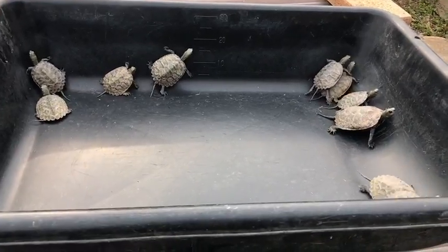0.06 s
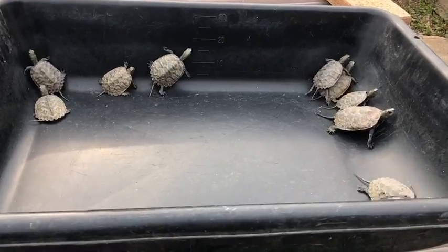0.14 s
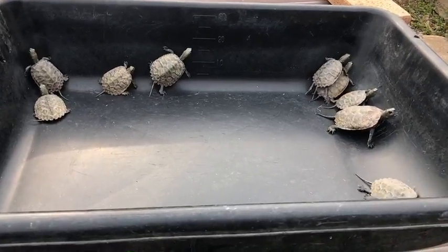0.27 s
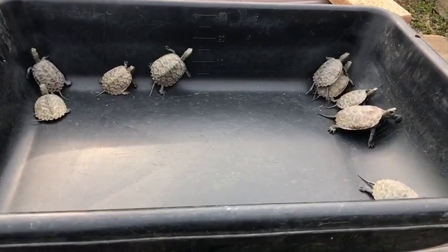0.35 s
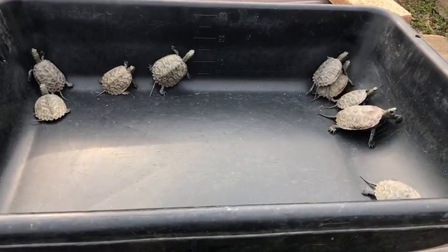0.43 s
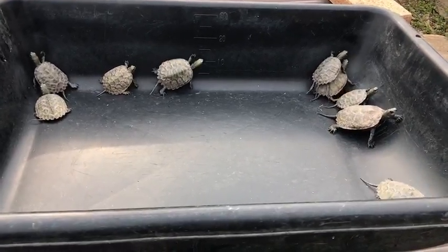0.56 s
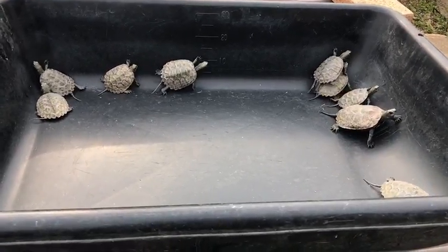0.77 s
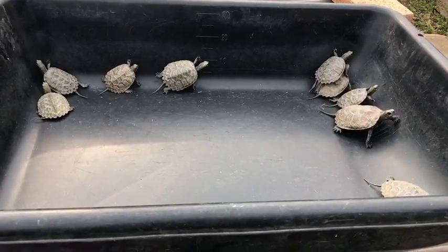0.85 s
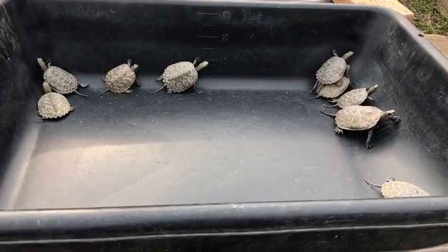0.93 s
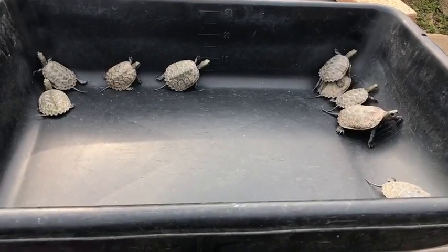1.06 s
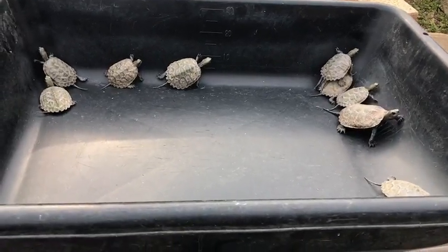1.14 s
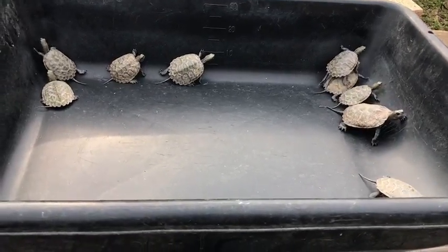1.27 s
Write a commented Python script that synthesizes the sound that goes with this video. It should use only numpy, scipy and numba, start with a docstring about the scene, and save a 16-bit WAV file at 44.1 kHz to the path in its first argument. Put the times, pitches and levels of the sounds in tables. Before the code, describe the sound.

Hollow knocks and thin claw scratches from small turtles clambering in a plastic tub outdoors.

```python
"""Turtles in a plastic tub

Small turtles clamber about, heard from just above the rim over quiet outdoor air.
The floor flexes under them in soft bumps; claws tick, scrape and squeak in stick-slip strokes.
Up front, shells knock on the plastic: a bending wave arrives treble first, the walls ring
and the floor booms late."""
import sys
import numpy as np
from scipy import signal
from scipy.fft import rfft, irfft
from scipy.io import wavfile
from scipy.ndimage import uniform_filter1d
from numba import njit

SR = 44100
rng = np.random.default_rng(int(sys.argv[2]) if len(sys.argv) > 2 else 0)


def store_wav(level_fs):
    """Save 16-bit WAV to argv[1]."""
    pcm = np.round(np.clip(np.atleast_2d(level_fs), -1, 1) * 32767)
    wavfile.write(sys.argv[1], SR, pcm.T.astype(np.int16))


N = 57330

# tone of the open air: frequency_hz, gain_db
AIR_EQ = [(20, -9), (60, 2.5), (120, 2), (250, -8.5), (500, -14.5), (1200, -11), (2300, -12.5), (5000, -20),
          (10000, -31), (15000, -27.5)]
# the floor flexing under the animals: peak_s, level_db, pitch_hz
FLOOR_BUMPS = [(0.248, -40.5, 64.5), (0.527, -39.5, 100), (0.559, -48.5, 57), (0.639, -49.5, 65.5),
               (0.701, -49.5, 77), (0.87, -51, 64.3), (0.936, -48, 71.1), (.995, -46, 63),
               (1.244, -45.5, 62)]
# claw tips catching, plus (at 0.0938 s) the crisp first contact of a shell knock: start_s, level_db, pitch_hz,
# decay_s
SHARP_TICKS = [(0.0872, -39, 2070, 0.001), (.0938, -37, 2700, 0.0017), (0.1373, -41.5, 4640, 0.0016),
               (0.1369, -38.5, 1460, 0.0039), (0.2376, -43, 3930, 0.0012), (0.2425, -42, 4200, 0.0018),
               (0.274, -41, 2520, 0.0032), (0.307, -45, 2850, .003), (0.4896, -41.5, 1800, .002),
               (0.662, -39, 3900, .0013), (0.73, -43, 5750, 0.0015), (.769, -44.5, 9100, 0.0054),
               (0.7697, -40, 2340, 0.0062), (.769, -46.5, 4400, .004), (0.965, -35, 1900, 0.00085),
               (1.094, -39, 1700, .003)]
# claws sliding: peak_s, rise_s, fall_s, level_db, pitch_hz, glide_octaves_per_s, width_ratio,
# overtone_db, grit_db
CLAW_STROKES = [(.01, 0.043, 0.022, -58, 2350, -13, 0.097, -20, 2),
                (0.174, 0.0062, 0.0055, -52, 3180, -8, 1, -20, -9),
                (0.322, 0.078, 0.099, -53.5, 2270, -1, 0.55, -12, -4),
                (0.632, 0.037, 0.03, -42.5, 3830, 1, 0.34, -9, -10),
                (0.687, 0.06, 0.032, -47.5, 3770, 1, 0.3, -7, -6.5),
                (0.793, 0.016, 0.031, -55.5, 4670, -9, 0.5, -9.5, 4),
                (.836, 0.052, 0.028, -47, 1990, -5.5, 0.38, -16, -16),
                (.88, 0.032, 0.06, -52.5, 1850, -3.5, 0.95, -28, -11),
                (0.982, 0.019, 0.075, -50.5, 2005, -4.5, 0.34, -7, -4),
                (1.068, 0.06, 0.047, -45.5, 1863, -1, 0.36, -2.5, -5.5),
                (1.145, 0.05, 0.038, -52, 1700, -2, 0.75, -6, -7)]
# tone of the grit in a stroke: frequency_hz, gain_db
GRIT_EQ = [(200, -14), (600, -32), (1400, 3.5), (2300, 8), (4500, 2.5), (7000, 1), (10000, -14),
           (15000, -10.5)]
# how the wall passes on the scraping: frequency_hz, gain_db
WALL_EQ = [(700, -8), (950, 9.5), (1150, 1), (1400, 2), (2400, -1), (2700, -2), (3100, 0.5), (3600, -4),
           (4600, -0.5), (5200, -4), (6200, 0.5), (7200, -8), (9000, 1)]
# slips falling into step: peak_s, half_length_s, level_db, pitch_hz, glide_octaves_per_s
CLAW_SQUEAKS = [(0.8, .004, -48, 2004, -4), (0.8085, .006, -39.5, 2397, -1), (.829, .013, -46, 2480, -4.5),
                (1.047, 0.0071, -63, 2020, -2), (1.122, 0.016, -52, 3790, -6.5)]
# resonances of the tub: pitch_hz, level_db, t60_s
TUB_MODES = [(108.9, -9.5, 0.64), (179.5, -12, 0.69), (219, 2.5, 0.21), (264, -9, 0.21), (291, 4, 0.19),
             (382, 1.5, 0.18), (526, -17, 0.44), (626, -12, 0.37), (736.5, -9.5, 0.22), (1050, -13.5, 0.33),
             (1162, -7, 0.092), (1282, -1, 0.11), (1750, -2.5, 0.084), (2347, -15, 0.14)]
# bending waves back from the corners: extra_travel_ms (at 1 kHz), level_db
CORNER_ECHOES = [(2.4, -36), (9.7, -24)]
# tone of a knock's attack: frequency_hz, gain_db
KNOCK_EQ = [(60, -26), (230, 4), (380, -1.5), (540, -9.5), (820, -9), (1100, 0.5), (1550, -5.5),
            (1820, -3.5), (2600, -13), (3300, -10.5), (4500, -21), (6800, -25), (7500, -32.5), (15000, -40)]
# shells hitting plastic: start_s, level_db, tilt_db_per_octave, travel_ms (at 1 kHz), ring_trim_db,
# boom_trim_db, spot_hz, spot_db (the ring of the struck spot)
SHELL_KNOCKS = [(0.0931, -26, -1.5, 2.75, -2, 6, 1835, -17),
                (0.207, -25.5, -1.5, 2.398, -0.5, 7, 2480, -15),
                (0.2086, -27, -1.5, 2.412, 4.5, 5, 1807, -16), (0.2296, -36, -0.5, 2.15, -4, -4, 1520, -38),
                (0.4218, -10, 1, 1.8, 2, -0.5, 1104, -12), (0.4453, -26, 3, 1.6, 2, -9, 1000, -10),
                (0.5053, -38.5, -3.5, 2.4, -17, 2, 1070, -7.5),
                (0.5746, -37.5, 1, 2.81, 9, 16.5, 1280, -15), (.6510, -35.5, -3, 2.73, -13, -20, 973, 1.5),
                (1.158, -47, -2.5, 4, 7, -20, 317, -6)]


def undb(db):
    """Decibels to gain."""
    return 10 ** (np.asarray(db) / 20)


def unit(x):
    """Scale to rms 1."""
    return x / np.sqrt(np.mean(x ** 2))


def eq_gain(curve, hz):
    """Gain of an EQ curve at the given frequencies."""
    points_hz, db = np.array(curve, float).T
    return undb(np.interp(np.log(hz + 1), np.log(points_hz), db))


def equalise(x, curve):
    """Colour a sound with an EQ curve."""
    return irfft(rfft(x) * eq_gain(curve, np.fft.rfftfreq(N, 1 / SR)), N)


def drift(rate_hz):
    """Smooth random modulation with a spread near 1."""
    hold = int(SR / rate_hz)
    steps = np.repeat(rng.standard_normal(N // hold + 1), hold)
    return 1.193 * uniform_filter1d(steps, hold)[:N]


def fade(t, t60_s):
    """A decay that loses 60 dB in t60_s."""
    return np.exp(-np.log(1000) * t / t60_s)


def add(out, x, start_s):
    """Mix a sound in at its cue."""
    i = max(int(start_s * SR), 0)
    out[i:i + len(x)] += x[:N - i]


@njit
def bandpass(x, hz, width):
    """State-variable band-pass with a moving centre and a relative width."""
    y = np.empty(len(x))
    band_state, low_state = 0., 0.
    for i in range(len(x)):
        g = np.tan(np.pi * min(hz[i], .45 * SR) / SR)
        band = (band_state + g * (x[i] - low_state)) / (1 + g * (g + width))
        band_state = 2 * band - band_state
        low_state += 2 * g * band
        y[i] = width * band
    return y


def outdoor_air(level_db=-55.5):
    """The bed: quiet, gently wavering rumble and hiss."""
    return undb(level_db + 0.62 * drift(23.2)) * unit(equalise(rng.standard_normal(N), AIR_EQ))


def floor_thump(t, hz, width_s):
    """A few slow swings of the tub floor around t = 0."""
    return np.exp(-(t / width_s) ** 2) * np.cos(2 * np.pi * hz * t)


def floor_bumps(t):
    """Soft low bumps as the floor flexes under the turtles."""
    return sum(undb(db) * floor_thump(t - peak, hz, width_s=0.013) for peak, db, hz in FLOOR_BUMPS)


def sharp_ticks(t):
    """A tiny bright crack: a claw tip catching the wall, or the crisp first contact of a shell knock."""
    out, short = np.zeros(N), t[:N // 32]
    for start, db, hz, decay in SHARP_TICKS:
        burst = rng.standard_normal(len(short)) * np.exp(-short / decay)
        crack = bandpass(burst, np.full(len(short), float(hz)), width=0.24)
        add(out, undb(db) * crack / abs(crack).max(), start)
    return out


def slips(rate_per_s=3300, spread_db=4):
    """Irregular stick-slip jerks of uneven size."""
    happens = rng.random(N) < rate_per_s / SR
    return happens * np.sign(rng.standard_normal(N)) * undb(spread_db * rng.standard_normal(N))


def claw_strokes(t, overtone_ratio=1.78, wander_octaves=0.061, pressure_db=1):
    """Slips ring two gliding resonances, mostly sinking as the claw slows, with grit around them."""
    out = np.zeros(N)
    for peak, rise, fall, db, hz, glide, width, overtone_db, grit_db in CLAW_STROKES:
        since = t - peak
        swell = np.exp(-(since / np.where(since < 0, rise, fall)) ** 2)
        effort = swell * undb(pressure_db * drift(140))
        pitch = hz * 2 ** (glide * np.clip(since, -2 * rise, 2 * fall) + wander_octaves * drift(90.32))
        jerks = slips()
        bands = (pitch, width), (pitch * overtone_ratio, width / 2)
        body, overtone = (unit(bandpass(bandpass(jerks, f, w), f, w)) for f, w in bands)
        grit = unit(equalise(slips(), GRIT_EQ))
        out += undb(db) * effort * (body + undb(overtone_db) * overtone + undb(grit_db) * grit)
    return equalise(out, WALL_EQ)


def tub_reverb(x, t, wet_db=-3.5):
    """Claw sounds bounce briefly through the air between the walls."""
    tail = rng.standard_normal(N) * fade(t, t60_s=0.032)
    wet = signal.fftconvolve(x, tail / np.sqrt(np.sum(tail ** 2)))[:N]
    return (x + undb(wet_db) * wet) / np.hypot(1, undb(wet_db))


def claw_squeaks(t, jitter=0.0268):
    """For a moment the claw slips regularly: a thin, wavering tone that sinks as it slows."""
    out = np.zeros(N)
    for peak, half, db, hz, glide in CLAW_SQUEAKS:
        since = t - peak
        pitch = hz * 2 ** (glide * np.clip(since, -2 * half, 2 * half)) * (1 + jitter * drift(700))
        tone = unit(np.sin(2 * np.pi * np.cumsum(pitch) / SR))
        out += undb(db) * np.exp(-(since / half) ** 2) * tone
    return out


def wall_ring(t, wobble=0.029, attack_s=0.0044):
    """The loaded walls ring unsteadily: each mode swells, wavers in pitch and dies away."""
    out = np.zeros(N)
    for hz, db, t60 in TUB_MODES:
        cycles = hz * np.cumsum(1 + wobble * drift(58.6)) / SR
        out += undb(db) * fade(t, t60) * np.sin(2 * np.pi * cycles)
    return out * (1 - np.exp(-t / attack_s))


def rim_echoes(t, hz, t60_at_1khz_s=0.083, attack_s=0.00045):
    """Waves scatter off the rim: a dense tail whose treble dies first."""
    out = np.zeros(N)
    noise = rfft(rng.standard_normal(N))
    for centre_hz in 1000 * 2. ** np.arange(-4, 5):
        octave = np.maximum(1 - abs(np.log2((hz + 1) / centre_hz)), 0)
        t60 = t60_at_1khz_s * 1000 / centre_hz
        makeup_gain = np.sqrt(2 * np.log(1000) / (t60 * SR))
        out += irfft(noise * octave, N) * fade(t, t60) * makeup_gain
    return out * (1 - np.exp(-t / attack_s))


def bending_wave(khz, travel_ms):
    """Phase lag behind the highest treble, for a wave whose speed grows with the root of frequency."""
    return np.exp(-2j * np.pi * travel_ms * (2 * np.sqrt(khz) - khz / np.sqrt(khz[-1])))


def shell_knocks(t, rim_db=-1, ring_db=-23, boom_db=-22.5, boom_lag_s=0.03586):
    """Each hit sends a falling chirp through the plastic and back, then rings the walls and floor."""
    out, hz = np.zeros(N), np.fft.rfftfreq(N, 1 / SR)
    khz = hz / 1000
    corners = sum(undb(db) * bending_wave(khz, travel_ms) for travel_ms, db in CORNER_ECHOES)
    corners *= undb(3 * np.log2(np.maximum(khz, 1)))  # 3 dB per octave of lift above 1 kHz
    walls = wall_ring(t)
    for start, db, tilt, travel_ms, ring_trim_db, boom_trim_db, spot_hz, spot_db in SHELL_KNOCKS:
        brightness = undb(tilt * np.log2(np.maximum(khz, 1 / 4)))
        direct = eq_gain(KNOCK_EQ, hz) * brightness * bending_wave(khz, travel_ms)
        echoes = corners + undb(rim_db) * rfft(rim_echoes(t, hz))
        attack = irfft(direct * (1 + echoes), N) / abs(irfft(direct, N)).max()
        ring = undb(ring_db + ring_trim_db) * walls
        spot = undb(spot_db) * fade(t, t60_s=0.044) * np.sin(2 * np.pi * spot_hz * t)
        boom = undb(boom_db + boom_trim_db) * floor_thump(t - boom_lag_s, hz=106, width_s=0.0074)
        add(out, undb(db) * (attack + ring + spot + boom)[:N // 2], start)
    return out


def scene():
    """The mono mix: knocks and claws over floor bumps and open air."""
    t = np.arange(N) / SR
    knocks = shell_knocks(t)
    claws = tub_reverb(sharp_ticks(t) + claw_strokes(t), t) + claw_squeaks(t)
    return (knocks + claws + floor_bumps(t) + outdoor_air())[None]


def record(dry, cutoff_hz=15600):
    """A steep low-pass trims the very top."""
    return signal.sosfilt(signal.ellip(10, .2, 70, cutoff_hz, fs=SR, output="sos"), dry)


dry = scene()
out = record(dry)
store_wav(out)
```